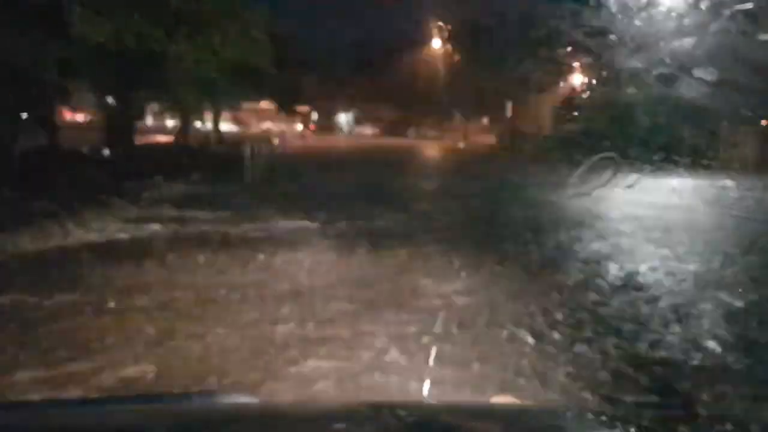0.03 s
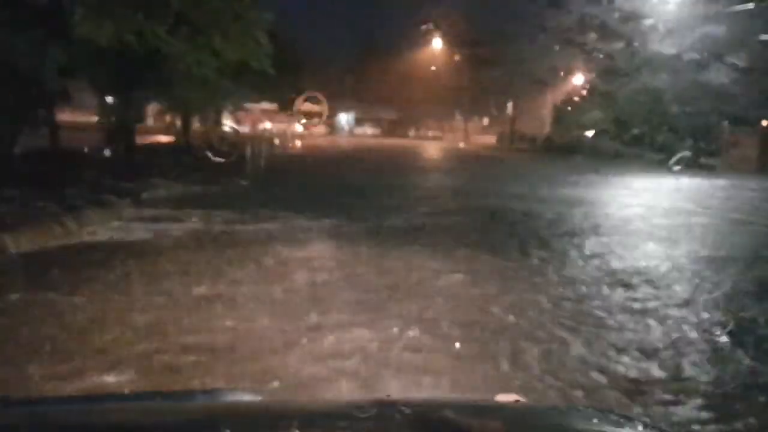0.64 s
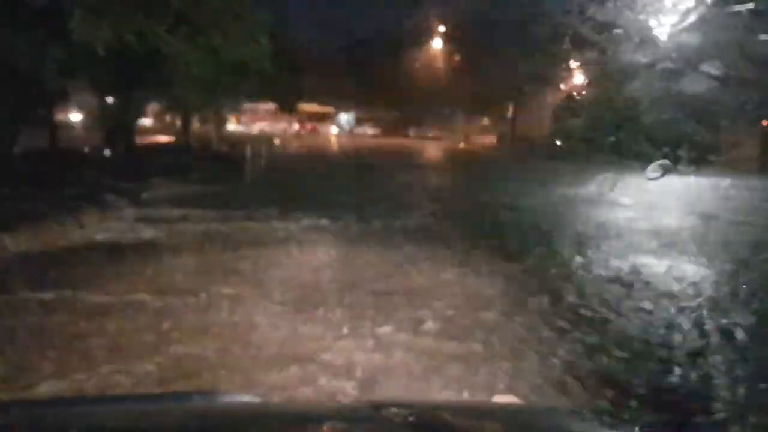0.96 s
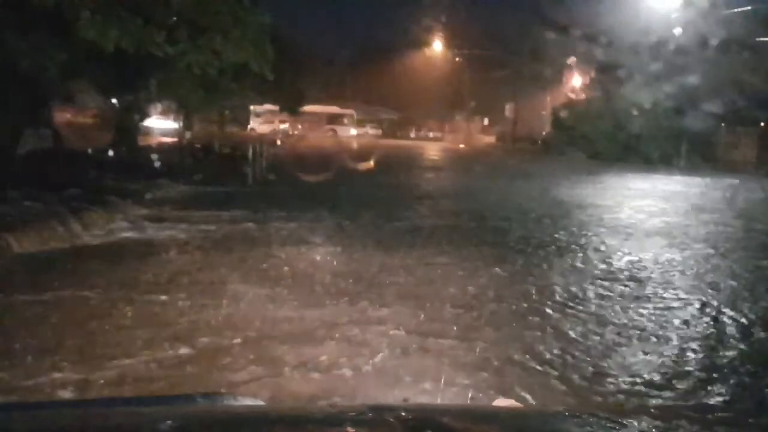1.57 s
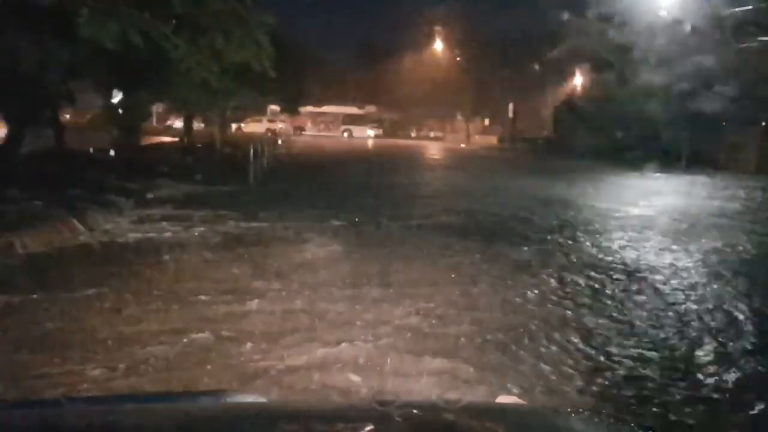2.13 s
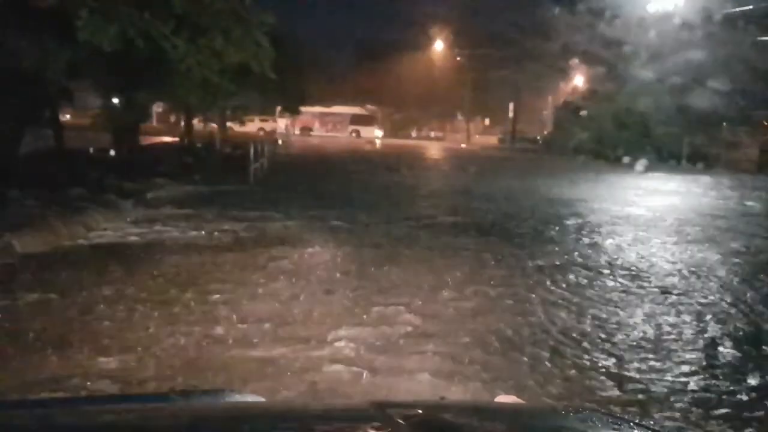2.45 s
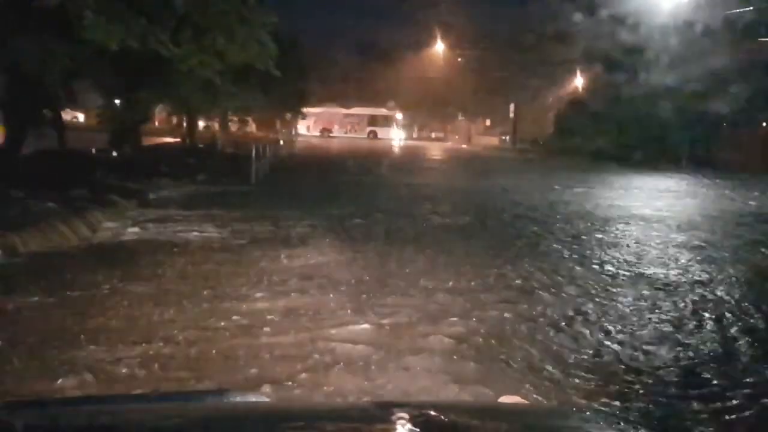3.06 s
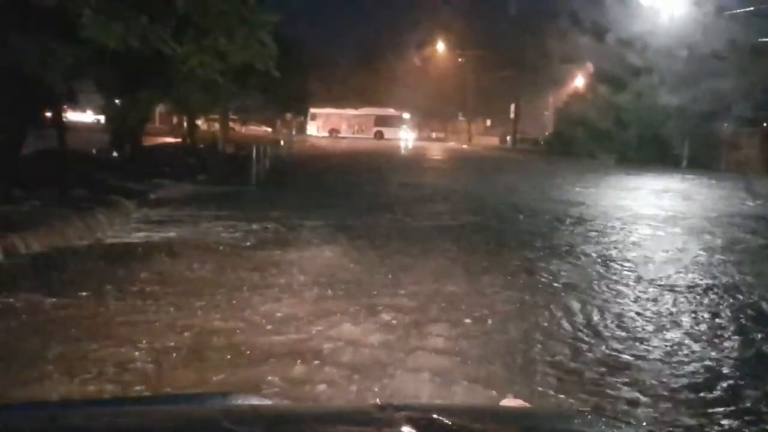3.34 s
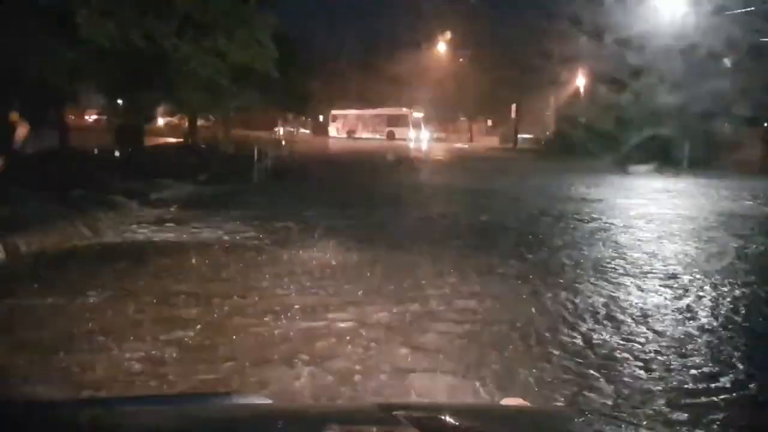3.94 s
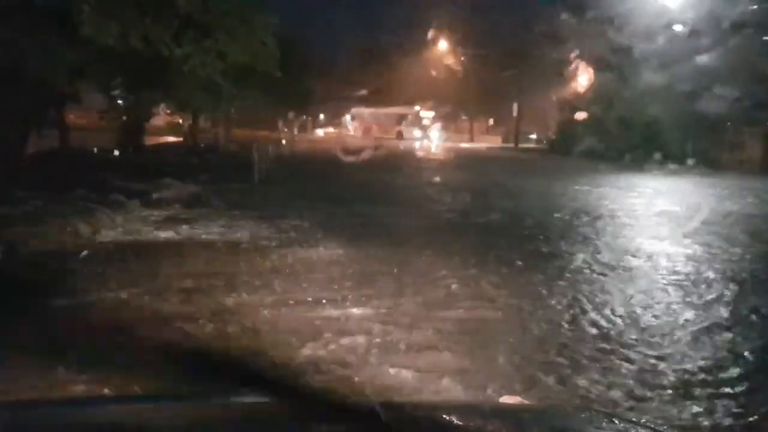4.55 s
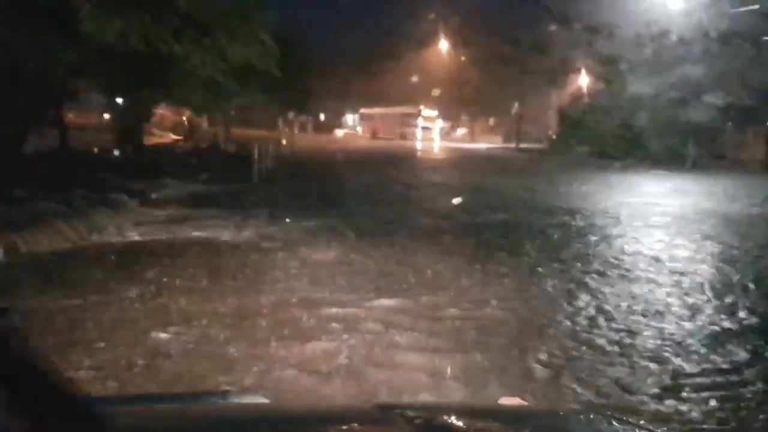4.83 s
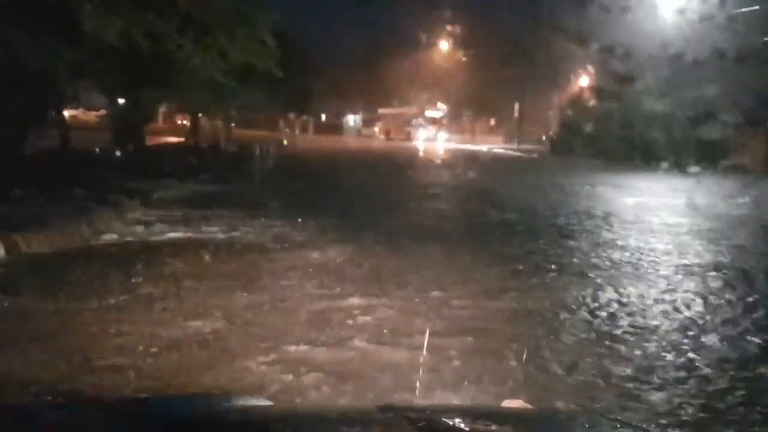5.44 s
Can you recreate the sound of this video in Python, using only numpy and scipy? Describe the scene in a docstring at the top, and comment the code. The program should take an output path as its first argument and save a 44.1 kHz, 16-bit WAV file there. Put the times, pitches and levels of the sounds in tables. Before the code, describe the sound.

Heavy rain is heard from inside an idling car, with the microphone behind the windscreen. For the whole five and a half seconds the engine booms low and steady, rain patters dully on the roof, and fine spray and scattered heavier drops tick on the glass. Fast wipers stand out above this. Their rubber judders over the glass in a low drone, groans as it slows and lands with a thump and a small click at each turn. The turns come at about 0.1, 0.5, 1.1 and 1.5 seconds and continue a little under half a second apart to the end. A faint, high, wavering squeak peaks at 1.3 seconds, after which the rain eases very slightly. Water leaves the blades with a faint thin hiss near 2.1 and 4.1 seconds. The loudest rubber groan comes at about 4.7 seconds.

```python
"""Heavy night rain from inside a car idling in a flooded street. From the start the engine booms low,
drops patter on the roof and tick on the windscreen, and the wipers run fast: rubber drones over the
glass, groans as it slows and thumps at each turn. A faint squeak peaks at 1.3 s, then the rain eases
a little. Water hisses off the blades near 2.1 s and 4.1 s; the loudest groan comes at 4.7 s."""
import sys
import numpy as np
from scipy import signal
from scipy.fft import rfft, irfft, next_fast_len
from scipy.io import wavfile
from scipy.ndimage import map_coordinates

SR = 44100
rng = np.random.default_rng(int(sys.argv[2]) if len(sys.argv) > 2 else 0)


def store_pcm(level_fs):
    """Save levels as 16-bit WAV."""
    pcm = np.round(np.clip(level_fs, -1, 1) * 32767).astype(np.int16)
    wavfile.write(sys.argv[1], SR, np.atleast_2d(pcm).T)


N = 242550
TIME_S = np.arange(N) / SR


def amp(db):
    """Decibels to gain."""
    return 10 ** (np.asarray(db) / 20)


def unit(x):
    """x at rms 1."""
    return x / np.sqrt(np.mean(x ** 2) + 1e-20)


def wobble(rate_hz):
    """Smooth random curve, rate_hz knots a second."""
    knots = rng.standard_normal(int(N * rate_hz / SR) + 4)
    return map_coordinates(knots, [TIME_S * rate_hz])


def colour(x, spectrum, peaks=()):
    """x through a minimum-phase filter with the given spectrum and resonant lifts."""
    size = 2 * next_fast_len(N)
    hz = np.fft.rfftfreq(size, 1 / SR)
    knot_hz, knot_db = np.transpose(spectrum)
    db = np.interp(np.log(hz + 1), np.log(knot_hz + 1), knot_db)
    for centre_hz, width_hz, lift_db in peaks:
        db += lift_db / (1 + (2 * (hz - centre_hz) / width_hz) ** 2)
    cepstrum = irfft(np.log(amp(db)))
    cepstrum[1:size // 2] *= 2
    cepstrum[size // 2 + 1:] = 0
    return irfft(rfft(x, size) * np.exp(rfft(cepstrum)))[:N]


def noise(spectrum, tilt_db_per_oct=0):
    """Coloured noise of rms 1; a positive tilt brightens it."""
    tilted = [(hz, db + tilt_db_per_oct * np.log2(hz / spectrum[0][0])) for hz, db in spectrum]
    return unit(colour(rng.standard_normal(N), tilted))


def impacts(rate_hz, spread_db):
    """Randomly timed impulses of varied size, rms 1."""
    hits = rng.random(N) < rate_hz / SR
    size_db = spread_db * np.minimum(rng.standard_normal(N), 2)
    sign = rng.choice([-1, 1], N)
    return unit(hits * sign * amp(size_db))


def bursts(peaks, rise_s, t60_s):
    """Envelope that climbs 60 dB in rise_s to each (s, dB) peak, then decays."""
    envelope = np.zeros(N)
    for s, db in peaks:
        down_db = 60 * np.maximum((s - TIME_S) / rise_s, (TIME_S - s) / t60_s)
        envelope += amp(db - np.minimum(down_db, 120))
    return envelope


def add(track, start_s, sound):
    """Mix a sound into a track at start_s."""
    part = track[max(round(start_s * SR), 0):][:len(sound)]
    part += sound[:len(part)]


# Engine orders. Each row: multiple of the crank rate, rms level in dB.
ENGINE_ORDERS = [(1, -37.5), (2, -29.5), (3, -50.5), (4, -41)]
# Cabin boom. Each row: frequency in Hz, relative level in dB.
BOOM_SPECTRUM = [(8, -38), (33, -10), (42, 14), (46, 16.5), (52, 0.5), (62, -18.5), (100, -8), (200, -47),
                 (500, -120)]

def engine():
    """Four cylinders at idle: two firings a turn, and the cabin booms with them."""
    crank_hz = 26.68 * (1 + .0042 * wobble(3.23))
    turns = np.cumsum(crank_hz) / SR
    hum = np.zeros(N)
    for order, db in ENGINE_ORDERS:
        gain = np.sqrt(2) * amp(db + .67 * wobble(7.3))
        hum += gain * np.sin(2 * np.pi * (order * turns + rng.random()))
    return hum + amp(-41.5) * noise(BOOM_SPECTRUM)


# Strength of the downpour. Each row: time in seconds, relative level in dB.
RAIN_LEVELS = [(0, -50.8), (1.3, -50.8), (1.7, -51.8), (2.6, -51.8), (3.1, -51.3), (3.7, -51.8),
               (4.7, -51.7), (5.1, -51.0), (5.5, -51.6)]
# Roof panel resonances. Each row: centre in Hz, width in Hz, lift in dB.
ROOF_MODES = [(225.4, 22, 3), (326.5, 21.6, 5.5), (504, 8.6, 0), (732, 22, 5.5), (847, 33, 3),
              (1176, 98, 5)]
# Roof patter and spray on the glass. Each row: frequency in Hz, relative level in dB.
ROOF_SPECTRUM = [(120, -21.5), (200, 4.5), (260, -2.5), (330, -2), (420, -3), (560, -5.5), (690, -12.5),
                 (840, -10.5), (1050, -16), (1600, -15), (2100, -18), (3000, -24.5), (5000, -36),
                 (12000, -69)]
SPRAY_SPECTRUM = [(1500, -35), (3500, -3), (5500, -1.5), (6200, -1.5), (7100, -3), (7800, 1), (8500, -5),
                  (9200, -9), (10300, -10), (11300, -8), (12500, -10), (13800, -11.5)]

def rain():
    """Dull patter through the lined roof and fine spray on the glass, each on a bed of far drops."""
    rain_db = np.interp(TIME_S, *np.transpose(RAIN_LEVELS))
    patter = impacts(rate_hz=1000, spread_db=3) + amp(5) * rng.standard_normal(N)
    roof = amp(rain_db + 15) * unit(colour(patter, ROOF_SPECTRUM, ROOF_MODES))
    droplets = impacts(rate_hz=900, spread_db=2) + amp(6) * rng.standard_normal(N)
    spray_db = rain_db - 13.1 + .45 * wobble(5) + .45 * wobble(25)
    return roof + amp(spray_db) * unit(colour(droplets, SPRAY_SPECTRUM))


# Heavy drops on the glass. Each row: start in seconds, relative level in dB.
HEAVY_DROPS = [(0.2124, -47), (0.3092, -52), (0.4589, -51), (0.578, -44), (0.6024, -46), (1.2625, -46),
               (1.3486, -49.5), (1.7466, -52), (2.0391, -44), (2.4402, -53), (2.6794, -52.5),
               (3.8171, -50.5), (4.011, -47.5), (4.275, -57), (4.61, -53), (4.68, -53), (4.755, -53),
               (4.8686, -46), (5.1235, -47.5), (5.305, -55)]
# Splash on the glass. Each row: frequency in Hz, relative level in dB.
SPLASH_SPECTRUM = [(600, -30), (3000, -2), (6000, 0), (7800, 2), (9300, -6.5), (11500, -5), (14000, -10)]

def windscreen_drops(light_count=220, faintest_db=-61, range_db=7):
    """Drops slap the glass and scatter into droplets: a few heavy ones among many light ones."""
    when, size = rng.random((light_count, 2)).T
    light_drops = np.column_stack([when * N / SR, faintest_db + range_db * size ** 2])
    t = np.arange(SR // 10) / SR
    slap, scatter = amp(-8 - 60 * t / .014), amp(-14 - 60 * t / .08)
    splash = (slap + scatter) * (1 - np.exp(-t / .0008))
    envelope = np.zeros(N)
    for s, db in np.vstack([HEAVY_DROPS, light_drops]):
        add(envelope, s, amp(db) * splash)
    return envelope * noise(SPLASH_SPECTRUM)


# Water leaving the blades. Each row: peak time in seconds, level in dB.
WATER_SHEETS = [(2.11, -73), (4.11, -71)]
# Its hiss. Each row: frequency in Hz, relative level in dB.
HISS_SPECTRUM = [(3000, -64), (6000, -18), (7800, 5), (9800, -7), (11400, 1.5), (13500, -20)]

def blade_hiss():
    """Water sheets off the blades with a thin hiss."""
    return bursts(WATER_SHEETS, rise_s=1, t60_s=1.07) * noise(HISS_SPECTRUM)


# Rub around the squeak. Each row: frequency in Hz, relative level in dB.
RUB_SPECTRUM = [(2000, -120), (3200, -14), (3800, -4), (4100, 0), (4400, -6), (5100, -20), (7000, -120)]

def blade_squeak(peak_s=1.34, top_hz=4070, rise_hz_per_s=800, waver_hz=95):
    """Rubber squeaks on one downstroke: a rising, wavering tone under a faint rub."""
    hz = top_hz + rise_hz_per_s * np.minimum(TIME_S - peak_s, 0) + waver_hz * wobble(130)
    tone = amp(-3.5) * np.sin(2 * np.pi * np.cumsum(hz) / SR)
    return bursts([(peak_s, -60.5)], rise_s=1, t60_s=1.15) * (tone + noise(RUB_SPECTRUM))


# Drag over one sweep, up and back. Each row: seconds since the foot turn, relative level in dB.
DRAG_CYCLE = [(0.04, -26.5), (0.09, -31), (0.2, -32), (0.33, -37), (0.39, -31), (0.461, -31.5),
              (0.53, -28.5), (0.598, -31), (0.72, -33.5), (0.78, -27.5), (0.865, -40.5), (0.91, -27)]
# Drifting grip on the wet glass. Each row: time in seconds, extra drag in dB.
GRIP_DRIFT = [(0.25, 2), (0.85, -2), (1.5, 0), (1.95, -1.5), (2.9, -2), (3.5, 1.5), (3.8, 0), (4.1, 1.5),
              (4.45, -2.5), (4.8, -0.5), (5.35, 0)]
# Friction noise. Each row: frequency in Hz, relative level in dB.
DRONE_SPECTRUM = [(30, -120), (60, -17), (78, -13.5), (92, -6.5), (104, -2.5), (125, -1), (150, -4),
                  (175, -11.5), (200, -18.5), (300, -21.5), (1200, -120)]

def blade_drone(sweep_s=.927, first_foot_s=.548, judder_hz_per_db=.5):
    """Rubber judders over the glass, louder and faster as it drags harder."""
    cycle_db = np.interp(TIME_S - first_foot_s, *np.transpose(DRAG_CYCLE), period=sweep_s)
    grip_db = np.interp(TIME_S, *np.transpose(GRIP_DRIFT))
    drag_db = cycle_db + grip_db + .96 * wobble(12)
    judder_hz = 100.7 + judder_hz_per_db * (drag_db + 30.5)
    judder_hz *= 1 + .0753 * wobble(22)
    judder = np.sqrt(2) * np.sin(2 * np.pi * np.cumsum(judder_hz) / SR)
    judder_db = drag_db - 3 + .5 * wobble(25.27)
    return amp(judder_db) * judder + amp(drag_db - .5) * noise(DRONE_SPECTRUM)


# Windscreen and cowl modes. Each row: frequency in Hz, relative level in dB, t60 in seconds.
SCREEN_MODES = [(88, -10, .28), (119, -8, .15), (158, -4, .08), (205, -5, .07), (282, -5, .06),
                (338, -5.5, .06), (398, -7.5, .055), (462, -14, .07), (535, -19, .06)]

def knock(attack_s, dull_db_per_oct=0):
    """Rubber strikes the windscreen, never twice alike; a soft blow rings duller."""
    t = np.arange(SR // 2) / SR
    scatter = rng.normal(0, [1, .025], (len(SCREEN_MODES), 2))
    phases = rng.uniform(0, 2 * np.pi, len(SCREEN_MODES))
    ring = np.zeros(len(t))
    for (hz, db, t60_s), (extra_db, detune), phase in zip(SCREEN_MODES, scatter, phases):
        mode_db = db + extra_db - dull_db_per_oct * np.log2(hz / SCREEN_MODES[0][0])
        ring += amp(mode_db - 60 * t / t60_s) * np.sin(2 * np.pi * hz * (1 + detune) * t + phase)
    return ring * (1 - np.exp(-t / attack_s))


# Turns at the foot of the windscreen. Each row: time in seconds, relative thump level in dB.
FOOT_REVERSALS = [(0.545, -14), (1.471, -16.5), (2.403, -13.5), (3.327, -13.5), (4.253, -15.5),
                  (5.179, -15.5)]
# Turns at the top. Each row: time in seconds, click level in dB, click tilt in dB per octave,
# relative thump level in dB, groan level in dB.
TOP_REVERSALS = [(0.138, -34, -2, -17, -34), (1.061, -35, -2, -15, -36), (1.988, -31.5, 2, -17.5, -36),
                 (2.912, -30.5, 0, -15.5, -34), (3.828, -39.5, -1, -16, -33),
                 (4.762, -31.5, -1.5, -14.5, -24.5)]
# Rubber groan, blade flop and linkage click. Each row: frequency in Hz, relative level in dB.
GROAN_SPECTRUM = [(60, -120), (110, -21), (136, -9.5), (155, -11.5), (174, 9), (190, -6), (240, -17.5),
                  (350, -28), (900, -120)]
FLOP_SPECTRUM = [(150, -2), (330, -1), (480, -2), (620, -8), (900, -7), (1300, -13.5), (3000, -25),
                 (12000, -70)]
CLICK_SPECTRUM = [(120, -30), (300, -7), (600, 0.5), (850, 1), (1080, 4), (1400, -3), (2200, -6),
                  (3000, -19), (9000, -60)]

def wiper_turns():
    """At each end of the sweep the blades groan as they slow, then flop over; the slack linkage clicks."""
    thumps, clicks, groan, flop, slack = np.zeros((5, N))
    for s, thump_db in FOOT_REVERSALS:
        # one blade lands just before the other
        add(thumps, s - .015, amp(thump_db - 3.5) * knock(attack_s=.004, dull_db_per_oct=4))
        add(thumps, s, amp(thump_db + 1) * knock(attack_s=.004))
        groan += bursts([(s - .04, -34)], rise_s=.61, t60_s=.34)
        flop += bursts([(s, thump_db - 23)], rise_s=.24, t60_s=.19)
        slack += bursts([(s - .018, thump_db - 23)], rise_s=.03, t60_s=.05)
    for s, click_db, tilt, thump_db, groan_db in TOP_REVERSALS:
        # the rubber tips over, then the arm lands with a round thud
        add(thumps, s - .027, amp(thump_db - 4.5) * knock(attack_s=.005))
        add(thumps, s + .007, amp(thump_db + 3) * knock(attack_s=.004, dull_db_per_oct=9))
        groan += bursts([(s - .02, groan_db)], rise_s=.61, t60_s=.34)
        clicks += bursts([(s, click_db)], rise_s=.002, t60_s=.035) * noise(CLICK_SPECTRUM, tilt)
    clicks += slack * noise(CLICK_SPECTRUM, tilt_db_per_oct=-2.5)
    return thumps + clicks + groan * noise(GROAN_SPECTRUM) + flop * noise(FLOP_SPECTRUM)


def scene():
    """Mono mix behind the windscreen."""
    background = engine() + rain() + windscreen_drops()
    wipers = blade_hiss() + blade_squeak() + blade_drone() + wiper_turns()
    return (background + wipers)[None]


def record(dry, cutoff_hz=13900):
    """Short fades at both ends, then a brick-wall low-pass."""
    fade = signal.windows.tukey(N, .002)
    size = next_fast_len(N + SR // 2)
    passband = np.fft.rfftfreq(size, 1 / SR) < cutoff_hz
    return irfft(rfft(dry * fade, size) * passband, size)[:, :N]


dry = scene()
out = record(dry)
store_pcm(out)
```